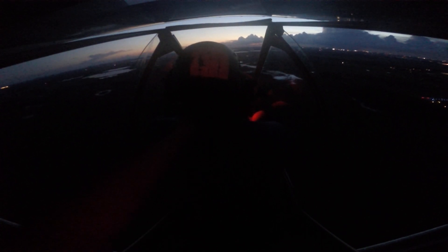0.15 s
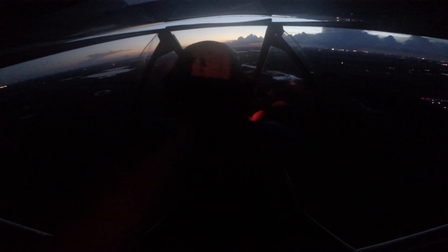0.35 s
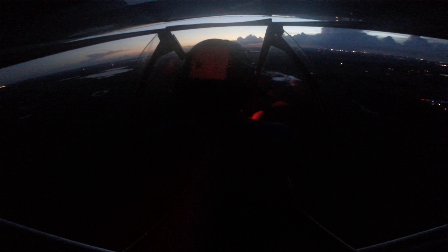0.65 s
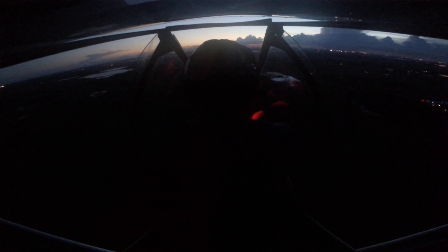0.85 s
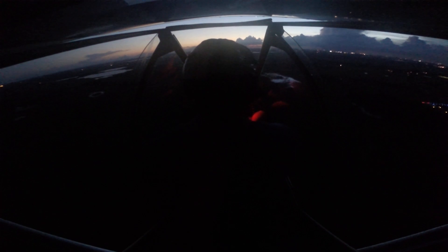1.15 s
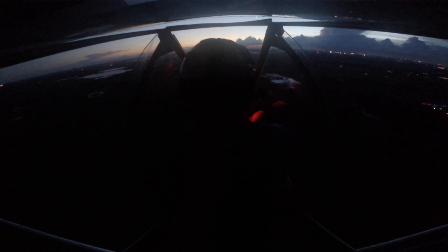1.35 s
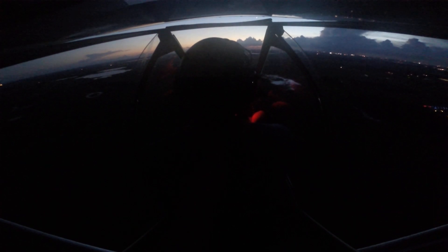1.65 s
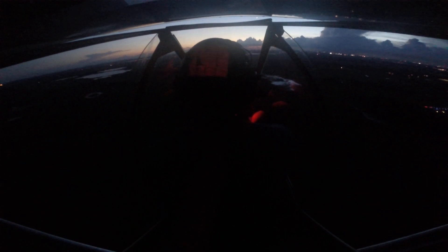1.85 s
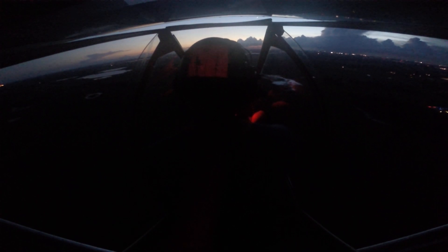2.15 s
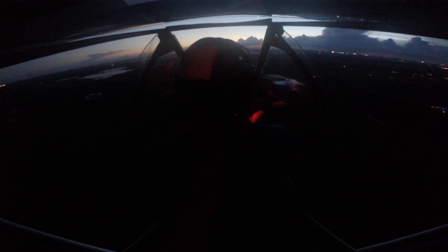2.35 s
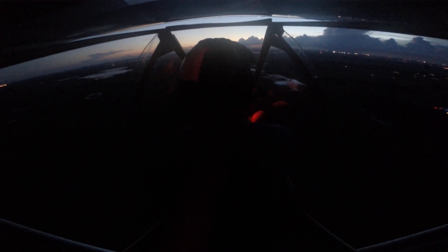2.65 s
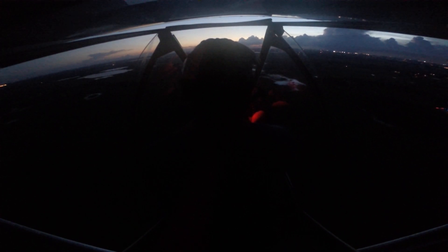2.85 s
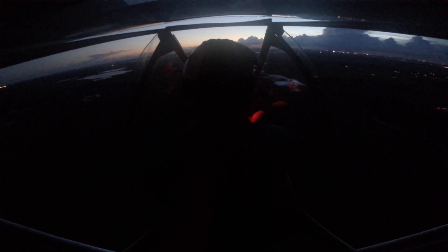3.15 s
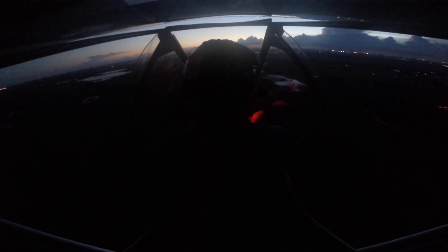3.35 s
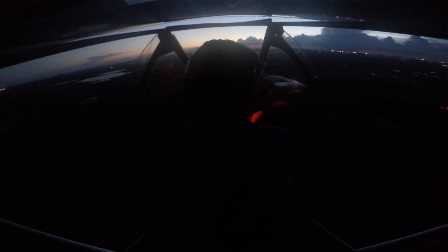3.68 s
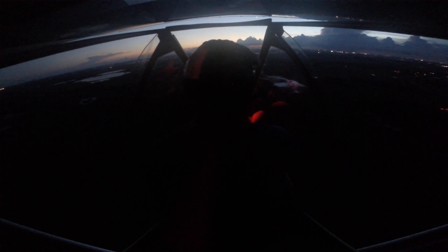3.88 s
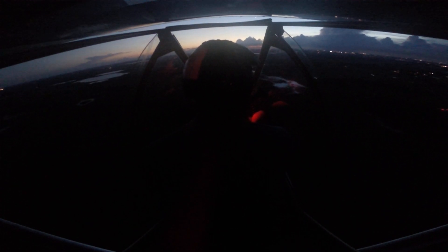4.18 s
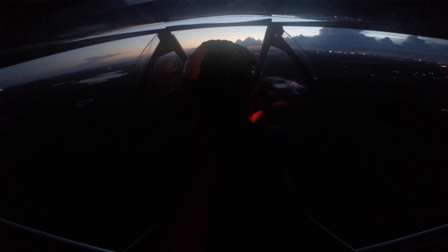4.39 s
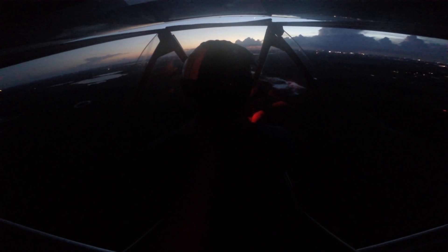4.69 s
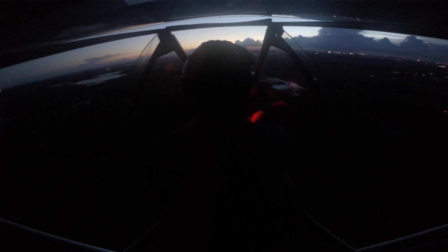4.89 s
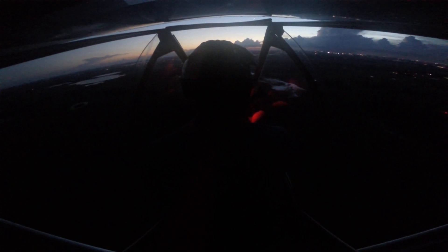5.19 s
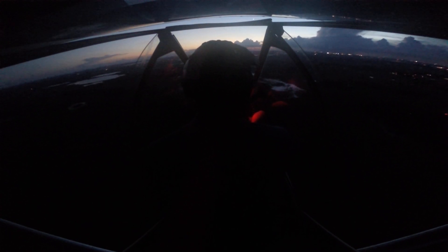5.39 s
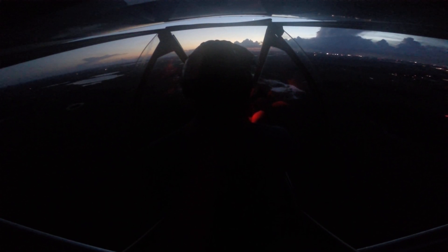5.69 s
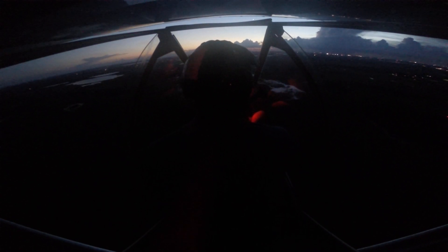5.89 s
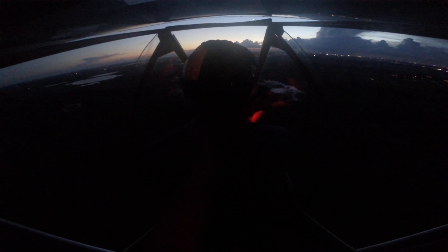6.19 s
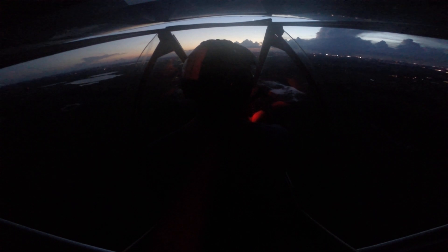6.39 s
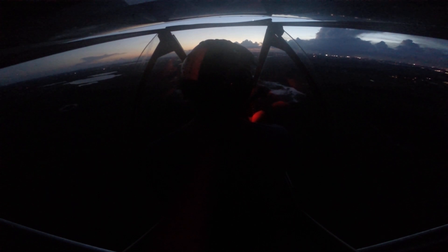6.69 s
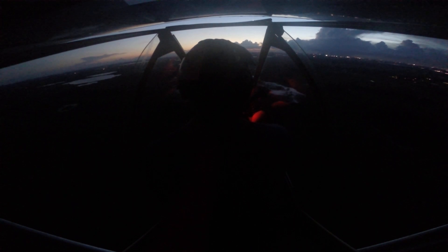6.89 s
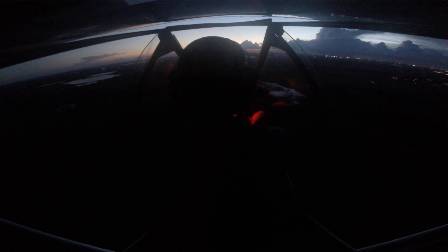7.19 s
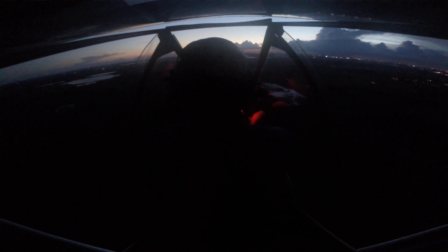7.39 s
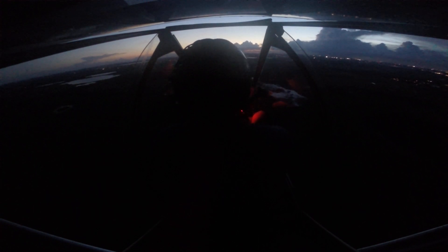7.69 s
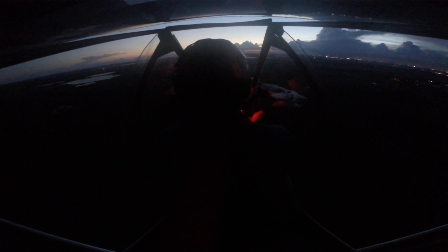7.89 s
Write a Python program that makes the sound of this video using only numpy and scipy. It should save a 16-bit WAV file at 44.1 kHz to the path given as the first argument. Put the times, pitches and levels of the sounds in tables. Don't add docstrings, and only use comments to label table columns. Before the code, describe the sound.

Steady buzzing drone of an ultralight aircraft in flight, dipping a little in pitch midway, with rushing air and rapid loose ticking near the end.

```python
import sys
import numpy as np
from scipy import signal
from scipy.fft import rfft, irfft, next_fast_len
from scipy.io import wavfile
from scipy.ndimage import uniform_filter1d

SR = 44100
rng = np.random.default_rng(int(sys.argv[2]) if len(sys.argv) > 2 else 0)


def wrap_up_sound(samples):
    columns = np.atleast_2d(samples).T
    tamed = np.clip(columns, -1, 1)
    steps = np.round(tamed * 32767).astype(np.int16)
    wavfile.write(sys.argv[1], SR, steps)


def invert_db(x):
    u = np.asarray(x, float) / 20
    return 10 ** u


N = 354563
TIME = np.arange(N) / SR
GEAR = 2.578

# (frequency [Hz], width [Hz], level [dB])
AIRFRAME = [(260.9, 9.7, 6.5), (623, 38, 12.5), (710.3, 15, 6.5), (782, 22, 6.5), (1042, 21, -13.5),
            (1104.5, 12, -10.5), (1189, 5.1, -10.5), (1227.6, 55, 12.5), (1334, 57, -15), (1439.6, 62, 23),
            (1562, 64, 16), (1664, 13, 4.5), (1700, 78, 8.5), (1866, 83, 9), (1956, 8.8, 5),
            (2110, 8.3, -1.5), (2426, 120, -3), (2534, 190, -8.5), (2690, 120, 10.5)]
# (frequency [Hz], width [Hz], level [dB])
HOUSING_MODES = [(2690, 720, 2), (3800, 470, -4), (5340, 690, -1.5), (7700, 710, -5), (9340, 530, -16),
                 (10240, 1300, -27.5), (12400, 790, -35), (13700, 820, -28.1)]


def unit(x):
    return x / np.sqrt(np.mean(x ** 2))


def walk(rate, size=1):
    hold, count = int(SR / rate / size), -(-N // size)
    held = np.repeat(rng.standard_normal(count // hold + 1), hold)
    slewed = uniform_filter1d(uniform_filter1d(held, hold), hold)
    return unit(slewed[:count])


def rise(x):
    return .5 + .5 * np.tanh(x)


def bumps_db(hz, table):
    return sum(db / (1 + (2 * (hz - mid) / width) ** 2) for mid, width, db in table)


def frame_turn(hz):
    turn_per_db = .02
    return sum(turn_per_db * db * np.arctan(2 * (mid - hz) / width) * 2 / np.pi
               for mid, width, db in AIRFRAME)


def ring(x, modes):
    out = 0
    for hz, width, db in modes:
        peak = signal.iirpeak(hz, hz / (1.6 * width), SR)
        once = signal.lfilter(*peak, x)
        out = out + invert_db(db) * signal.lfilter(*peak, once)
    return out


def crank_speed():
    # (time [s], crank speed [Hz])
    speed = [(0.0, 90.48), (1.0, 90.44), (1.5, 90.3), (2.25, 90.33), (2.75, 88.72), (3.25, 87.27),
             (3.75, 86.41), (4.25, 85.8), (5.0, 85.22), (6.0, 84.55), (6.75, 83.95), (7.3, 83.81),
             (8.04, 83.34)]
    return uniform_filter1d(np.interp(TIME, *np.transpose(speed)), SR // 4)


def tones(table, hz, turns, eased, waver_db, frame_share=1):
    out, step = np.zeros(N), slice(None, None, 256)
    smear = -.075
    for k, cruise_db, eased_db in table:
        pitch = k * hz[step]
        db = cruise_db + (eased_db - cruise_db) * eased[step]
        db = db + frame_share * bumps_db(pitch, AIRFRAME)
        waver = waver_db * np.sqrt(k) * walk(rate=6, size=256)
        gain = np.interp(TIME, TIME[step], invert_db(db + waver))
        lag = smear * k ** 2 + np.interp(TIME, TIME[step], frame_turn(pitch))
        out += np.sqrt(2) * gain * np.cos(2 * np.pi * (k * turns + lag))
    return out


def engine_tones(hz, turns, eased):
    # (level at cruise [dB], level eased back [dB])
    crank = [(-26.5, -20), (-26, -21.5), (-29.5, -29), (-15.5, -21.5), (-32.5, -21), (-59.5, -37),
             (-61.5, -49), (-34, -54), (-37.5, -41.5), (-45.5, -34), (-42.5, -31), (-35, -42), (-37, -31),
             (-38, -44.5), (-30, -35.5), (-51.5, -22.5), (-58.5, -47.5), (-53.5, -51), (-55, -58.5),
             (-44.5, -54.5), (-48.5, -60), (-54.5, -62.5), (-68, -52), (-45.5, -38), (-36.5, -33),
             (-45.5, -45), (-45.5, -32), (-37.5, -38.5), (-54, -50.5), (-67, -31)]
    upper = [(-53.5 - .31 * k, -48.5 - .31 * k) for k in range(10)]
    rows = [(k + 1, *db) for k, db in enumerate(list(crank) + upper)]
    return tones(rows, hz, turns, eased, waver_db=.194)


def propeller_tones(hz, turns, eased):
    multiples = [1, 2, 3, 6, 7, 9, 12, 15, 18, 21, 24, 30, 33, 39, 51]
    # (level at cruise [dB], level eased back [dB])
    prop_levels = [(-26.5, -26.5), (-49.5, -52), (-39.5, -36), (-29, -24.5), (-41, -45), (-36.5, -33),
                   (-34.5, -34), (-38.5, -30.5), (-61.5, -48.5), (-49, -39), (-54, -51.5), (-41.5, -47.5),
                   (-54.5, -41), (-46.5, -41), (-58, -53.5)]
    rows = [(m / GEAR, *db) for m, db in zip(multiples, prop_levels)]
    return tones(rows, hz, turns, eased, waver_db=.3)


def rocking_tones(hz, turns, eased):
    # (crank multiple, propeller multiple, level at cruise [dB], level eased back [dB])
    mixed = [(1, 1, -48.5, -48), (2, 1, -39.5, -47.5), (3, -1, -46, -38.5), (2, 3, -51, -32),
             (3, 1, -54.5, -45.5), (4, -1, -43.5, -46), (5, -3, -45, -49), (4, 1, -46.5, -37),
             (5, 1, -57.5, -62), (8, -1, -45, -65.5), (8, 1, -53, -67), (10, 1, -73, -38.5),
             (13, 1, -44, -41.5), (17, 1, -50.5, -63)]
    rows = [(round(k) + round(m) / GEAR, *db) for k, m, *db in mixed]
    return tones(rows, hz, turns, eased, waver_db=.3, frame_share=0)


def roar(hz, turns, eased, loose):
    # (frequency [Hz], level [dB per Hz])
    roar_curve = [(15, -52.5), (38, -54), (75, -54), (130, -57), (250, -50.5), (370, -52.5), (560, -61.5),
                  (1000, -57.5), (1500, -57), (2600, -60), (3900, -66.5), (4500, -74.5), (9000, -90),
                  (15000, -106.1)]
    # (frequency [Hz], width [Hz], level [dB])
    pockets = [(3180, 390, -7.5), (3760, 750, 4.5), (4090, 840, -3.9), (4660, 200, 6), (5010, 260, -3),
               (6700, 340, 0), (8100, 700, 0), (10050, 250, -1), (10500, 620, 7), (11300, 500, -1.7),
               (12000, 480, 6), (13600, 870, 5)]
    # (crank speed [Hz], width [Hz], level [dB])
    buffet = [(86.6, 0.65, 3)]
    low_db = -6 + 3 * rise((87.6 - hz) / 1) + bumps_db(hz, buffet)
    high_db = -4.5 + 4.2 * eased + 2 * loose

    size = next_fast_len(N, True)
    pitch = np.fft.rfftfreq(size, 1 / SR) + 1
    curve_hz, curve_db = np.transpose(roar_curve)
    db = np.interp(np.log(pitch), np.log(curve_hz), curve_db)
    db = db + .17 * bumps_db(pitch, AIRFRAME) + bumps_db(pitch, pockets)
    spectrum = rfft(rng.standard_normal(size)) * invert_db(db) * np.sqrt(SR / 2)

    bass_share = 1 / (1 + (pitch / 550) ** 4)
    hiss_share = 1 / (1 + (3200 / pitch) ** 4)
    bass = irfft(spectrum * bass_share, size)[:N]
    gas = irfft(spectrum * (1 - bass_share) * (1 - hiss_share), size)[:N]
    hiss = irfft(spectrum * hiss_share, size)[:N]
    firing_db = 2.5 * np.cos(2 * np.pi * turns) + 2.3 * np.cos(4 * np.pi * turns + 1.1)
    puff = invert_db(firing_db + walk(rate=25))
    return invert_db(low_db) * (bass + gas * puff) + invert_db(high_db + .56 * walk(rate=13)) * hiss


def buzz(shake, turns, eased):
    low_pass = signal.butter(4, 600, fs=SR, output="sos")
    sway = unit(signal.sosfilt(low_pass, shake))
    crest = signal.find_peaks(sway, height=0)[0]
    chance = rng.standard_normal((N // 20, 2))[:len(crest)]
    db = 4.3 * sway[crest] + 5.5 * np.cos(2 * np.pi * (turns[crest] - .3))
    db += 2.2 * chance[:, 1]
    late = (6 * np.abs(chance[:, 0])).astype(int)
    knocks = np.zeros(N)
    knocks[np.minimum(crest + late, N - 1)] = invert_db(db)
    buzz_db = -43.5 - 3 * np.clip(eased, 0, 1) ** .31 + 1.24 * walk(rate=30)
    return invert_db(buzz_db) * unit(ring(knocks, HOUSING_MODES))


def each_turn(angle, place, db, scatter_db):
    at = np.flatnonzero(np.diff(np.floor(angle - place)))
    extra_db = scatter_db * rng.exponential(size=N // 100)[:len(at)]
    return np.transpose([TIME[at], db[at] + extra_db])


def strike(events, modes, boost_db, scrape_s):
    blows = np.zeros(N + 256)
    fade = np.exp(-np.arange(256) / SR / scrape_s)
    for (s, db), grit in zip(events, rng.standard_normal((len(events), 256))):
        scrape = grit * fade
        blows[int(s * SR):][:256] += invert_db(db + boost_db) * scrape / np.linalg.norm(scrape)
    return ring(blows[:N], modes)


def miss(angle, place):
    return 1 - np.cos(2 * np.pi * (angle - place))


def housing_slaps(turns, eased):
    slaps = each_turn(turns, .42, -32 - 9 * eased, scatter_db=1.8)
    return strike(slaps, HOUSING_MODES, boost_db=23, scrape_s=.0004)


def fitting_taps(turns, loose):
    # (frequency [Hz], width [Hz], level [dB])
    fitting = [(3000, 500, 14), (3750, 500, 19), (8900, 400, -6), (11950, 300, 0), (13400, 350, 1),
               (14650, 250, -14)]
    tap_db = -42.5 - 18 * (1 - loose) - 5 * miss(turns, .5)
    taps = each_turn(turns / GEAR, .25, tap_db, scatter_db=1.1)
    return strike(taps, fitting, boost_db=31, scrape_s=.0016)


def bracket_clacks(hz, turns):
    # (frequency [Hz], width [Hz], level [dB])
    bracket = [(2470, 350, -3), (2780, 400, -0.5), (3760, 450, -3), (5600, 1000, -18)]
    clack_db = -19 - 6.5 * np.maximum(hz - 83.9, 0) - 15 * miss(turns / GEAR, .765)
    clacks = each_turn(turns, .22, clack_db, scatter_db=1.1)
    return strike(clacks, bracket, boost_db=30, scrape_s=.001)


def scene():
    cruise_hz, eased_hz = 90.5, 83.5
    hz = crank_speed()
    turns = np.cumsum(hz * (1 + .0002 * walk(rate=4))) / SR
    eased = (cruise_hz - hz) / (cruise_hz - eased_hz)
    loose = rise((TIME - 7.2) / .35)

    engine = engine_tones(hz, turns, eased)
    propeller = propeller_tones(hz, turns, eased)
    rocking = rocking_tones(hz, turns, eased)
    air = roar(hz, turns, eased, loose)
    rattle = buzz(engine + .55 * (propeller + air), turns, eased)
    ticks = housing_slaps(turns, eased) + fitting_taps(turns, loose) + bracket_clacks(hz, turns)
    return (engine + propeller + rocking + air + rattle + ticks)[None]


def top_cut(x):
    return signal.sosfilt(signal.butter(12, 15140, fs=SR, output="sos"), x)


def record(dry):
    return top_cut(dry)


dry = scene()
out = record(dry)
wrap_up_sound(out)
```